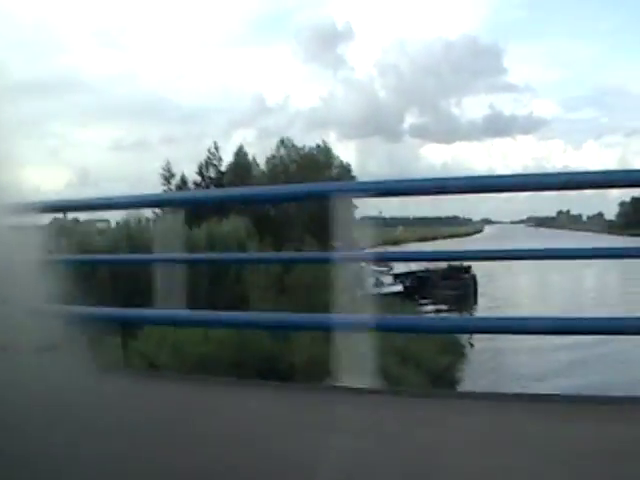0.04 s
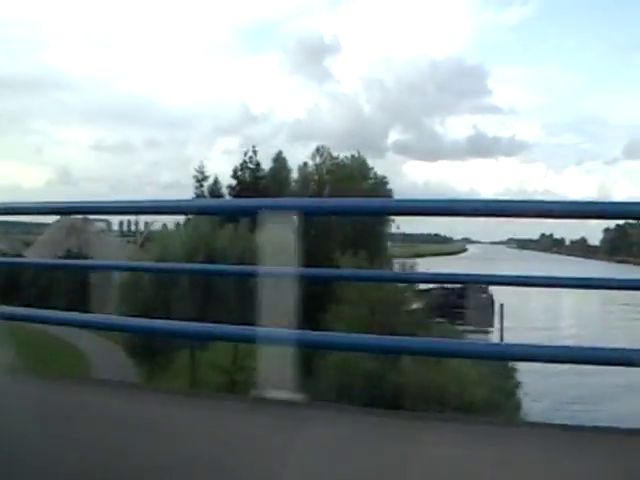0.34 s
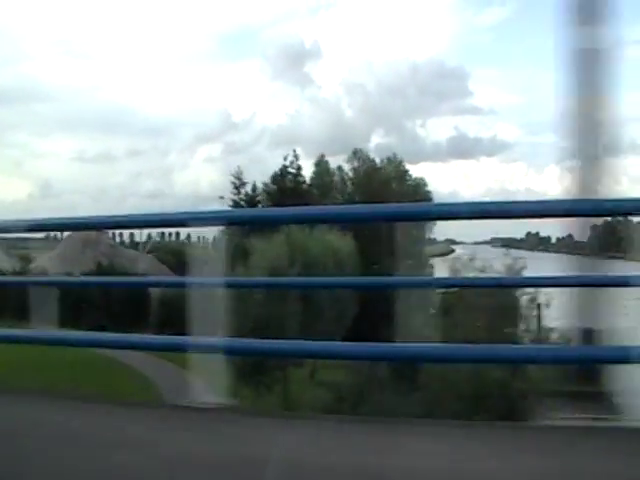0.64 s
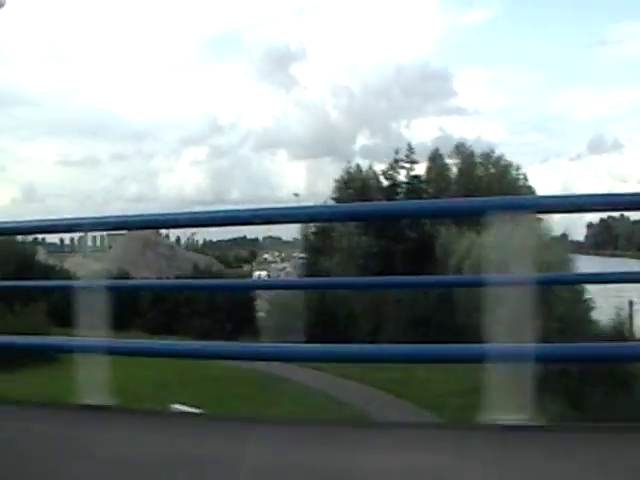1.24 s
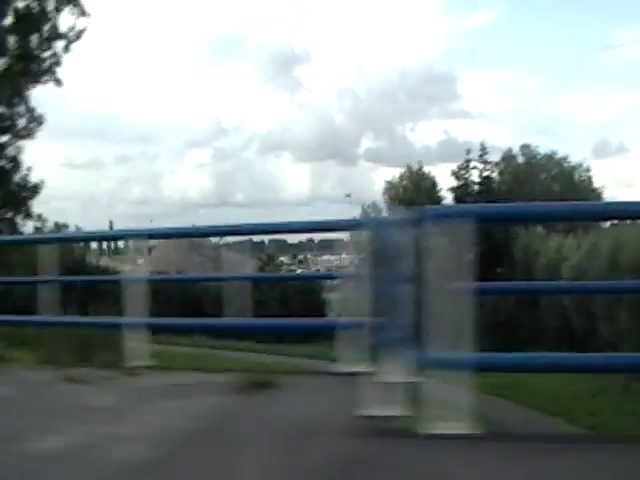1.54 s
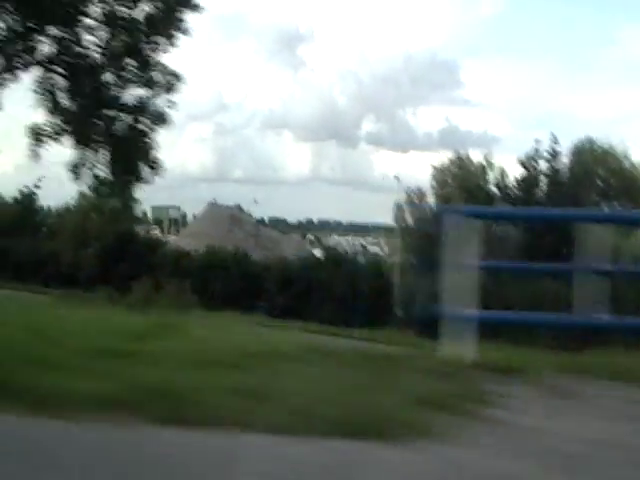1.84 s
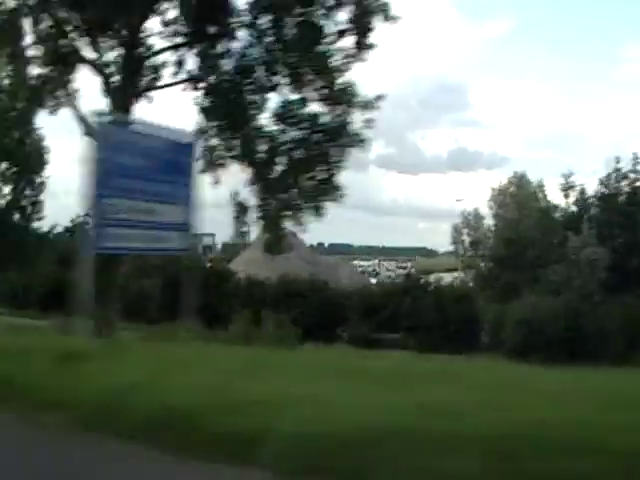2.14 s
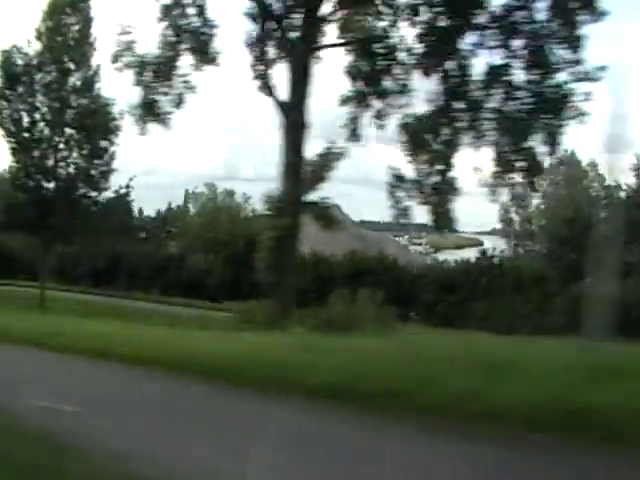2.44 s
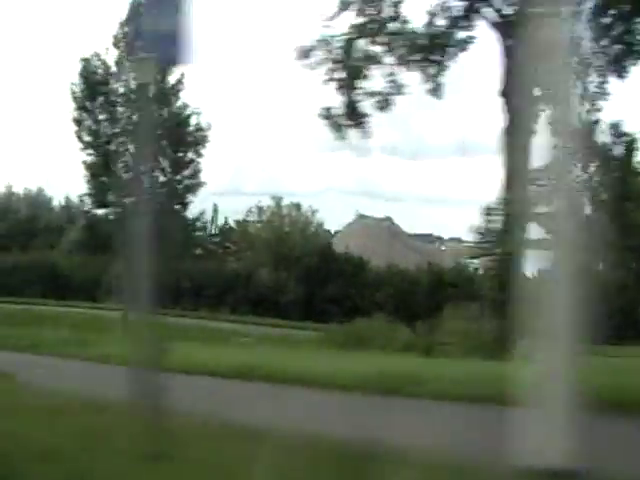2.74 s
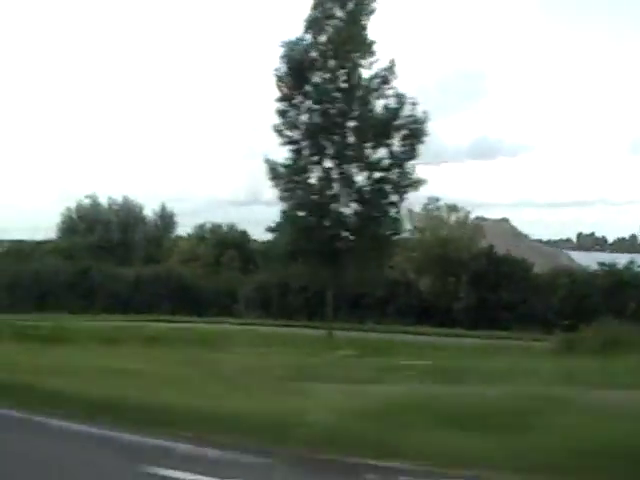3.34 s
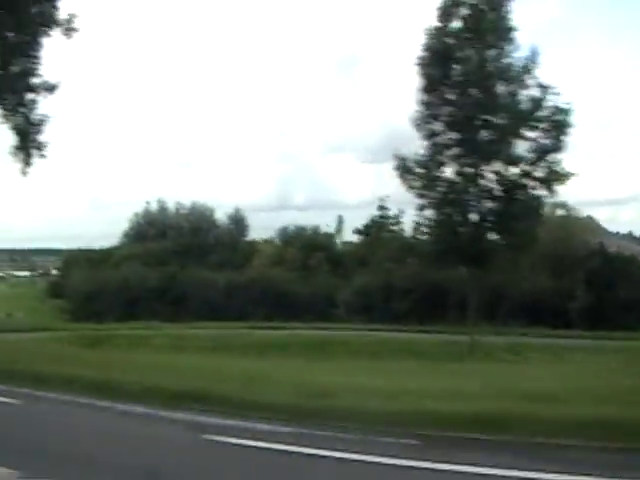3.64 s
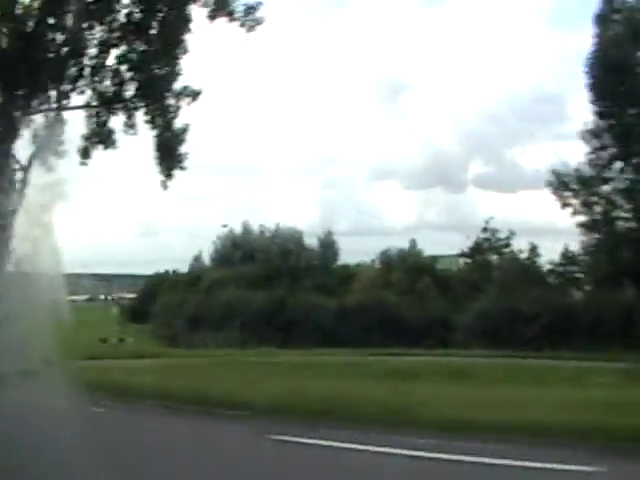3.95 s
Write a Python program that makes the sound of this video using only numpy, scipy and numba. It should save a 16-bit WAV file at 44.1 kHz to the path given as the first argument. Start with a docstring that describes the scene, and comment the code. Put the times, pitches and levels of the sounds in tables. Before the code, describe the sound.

A car driving, heard from inside, rumbling steadily with small creaks, thuds and one knock.

```python
"""Inside a car, leaving a bridge deck for smoother asphalt. The road shakes body and panels into a low
rumble; the tyres drone and roar, brighter off the bridge; air hisses along the windows. Loose trim
rattles, creaks and squeaks, and the wheels thud over seams at the bridge end. The indicator relay starts
to tick. One bump knocks hard enough to duck the gain control; a faint swish follows."""
import sys
import numpy as np
from scipy import signal
from scipy.fft import rfft, irfft
from scipy.io import wavfile
from scipy.ndimage import uniform_filter1d
from numba import njit

SR = 44100
rng = np.random.default_rng(int(sys.argv[2]) if len(sys.argv) > 2 else 0)


def master_out(mix):
    """Clip the mix to full scale and print it as 16-bit PCM to the path in sys.argv[1]."""
    frames = np.transpose(np.atleast_2d(mix))
    ceiling = np.clip(frames, -1, 1)
    pcm = np.round(ceiling * 32767).astype(np.int16)
    wavfile.write(sys.argv[1], SR, pcm)


N = 176400

# cabin stereo width, side against mid: f/Hz, level/dB
SIDE_SPECTRUM = [(60, -16.5), (250, -19), (500, -12.5), (1000, -8.5), (2000, -9), (5000, -4.5),
                 (12000, -9.5)]
# road shaking the body: t/s, boom level/dB, panel level/dB
ROAD_SHAKE = [(0, -16.5, -15.5), (.42, -16, -13.5), (.56, -10, -15), (0.799, -15, -14), (1.25, -14.5, -14),
              (1.45, -14.5, -17), (1.62, -13.5, -14.5), (1.78, -15, -21), (1.87, -20.5, -20.5),
              (3.25, -19.5, -20.5), (3.38, -15, -18), (3.48, -11, -16), (3.62, -13, -16.5),
              (3.85, -17, -16), (4, -14, -19.5)]
# resonances of cabin, panels and tread: f/Hz, width/Hz, level/dB
BOOM_MODES = [(61, 25, -9), (77.4, 14, -3.5), (93.2, 11.8, 0), (115.3, 36, -2)]
PANEL_MODES = [(163, 92, -1.5), (191, 52, -0.5), (234, 85, -2.5), (288.7, 56, -0.5), (323.5, 215, -11)]
TREAD_MODES = [(1445, 55, 0), (1710, 130, -6), (1865, 60, -6)]
# tyre roar on each surface, air on the windows: f/Hz, relative level/dB
DECK_SPECTRUM = [(220, -34.5), (380, -6), (465, -18.5), (508, -4.5), (753, -15.5), (1040, -16), (1470, -25),
                 (1740, -27), (2600, -43.5), (3380, -79), (5720, -120)]
ASPHALT_SPECTRUM = [(220, -30.5), (380, 1.5), (439, -7.5), (476, -1), (546, -1.5), (1040, -11),
                    (1280, -17.5), (1470, -12.5), (1880, -18.5), (2600, -32), (3380, -51.5), (5720, -120)]
AIR_SPECTRUM = [(2600, 5), (4000, -2), (6300, -17), (7800, -20), (9500, -26), (11500, -25.5),
                (16000, -36.5)]
# loose trim clicking, parts settling after the bump: t/s, level/dB
TRIM_CLICKS = [(0.7, -38), (1.001, -38), (1.231, -36.5), (1.26, -42), (1.346, -39), (1.396, -39.5),
               (1.606, -36), (1.772, -38.5), (1.818, -23.5), (1.916, -36.5)]
SETTLE_CLICKS = [(3.591, -30), (3.599, -35), (3.651, -29)]
# trim rubbing as the body twists: t/s, length/s, level/dB, f/Hz
TRIM_CREAKS = [(.858, .062, -39, 2700), (1.528, .045, -36, 1750), (1.664, .055, -34, 2000),
               (1.72, .013, -25, 1850), (1.728, .034, -33, 3000)]
# faint high squeaks: t/s, length/s, level/dB, f/Hz
HIGH_SQUEAKS = [(.94, .11, -70, 7000), (1.06, .23, -66, 7400), (1.78, .16, -71, 7100),
                (3.14, .13, -70, 6550)]
# wheels striking road seams: t/s, f/Hz, level/dB
SEAM_HITS = [(1.614, 195, -10), (1.661, 112, -4), (1.724, 89, -4.5), (1.773, 86, -3.5)]
# responses of the struck and rubbed parts: f/Hz, relative level/dB
RATTLE_SPECTRUM = [(700, -22.5), (1500, -8), (2200, 13.5), (3400, 0), (5000, 1.5), (6400, -7), (7700, -6.5),
                   (10000, -17.5), (12000, -12.5), (16500, -32.5)]
CREAK_SPECTRUM = [(900, 3), (1900, 4), (4200, -11.5), (12000, -29), (16500, -42)]
RELAY_SPECTRUM = [(3000, 1), (6300, -12), (8200, -0.5), (9700, -13), (11000, -8), (13500, -19),
                  (17000, -21)]
KNOCK_SPECTRUM = [(400, 1.5), (950, 3.5), (1700, -5.5), (2400, -4), (3450, -7), (6300, -22), (7600, -14.5),
                  (10500, -25), (12200, -24), (16500, -42)]

T_S = np.arange(N) / SR
F_HZ = np.maximum(np.arange(N // 2 + 1) * SR / N, 1)


def undb(db):
    """Decibels to gain."""
    return 10 ** (np.asarray(db) / 20)


def unit(x):
    """Scale to rms 1."""
    return x / np.sqrt(np.mean(x ** 2))


def colour(spectrum):
    """Gain per bin through (f/Hz, level/dB) points."""
    hz, db = np.array(spectrum, float).T
    return undb(np.interp(np.log(F_HZ), np.log(hz), db))


def resonances(modes):
    """Gain per bin of steep-sided resonances, summed in power."""
    power = 0
    for hz, width_hz, db in modes:
        detuning = (F_HZ ** 2 - hz ** 2) / (F_HZ * width_hz)
        power += (undb(db) / (1 + detuning ** 2)) ** 2
    return np.sqrt(power)


def ring(x, spectrum):
    """Minimum-phase filter of unit power, rolled off below the spectrum's first point."""
    gain = colour(spectrum) / (1 + (spectrum[0][0] / 2 / F_HZ) ** 2)
    cepstrum = irfft(np.log(unit(gain) + 1e-5), N)
    cepstrum[1:N // 2] *= 2
    cepstrum[N // 2 + 1:] = 0
    return irfft(rfft(x) * np.exp(rfft(cepstrum)), N)


def cabin_noise(gain):
    """Stereo noise of rms 1, narrow in the bass, wider in the treble."""
    mid, side = rfft(rng.standard_normal((2, N))) * gain
    side *= colour(SIDE_SPECTRUM)
    return unit(irfft(np.array([mid + side, mid - side]), N))


def white_noise(side_db):
    """White stereo noise of rms 1."""
    mid, side = rng.standard_normal((2, N))
    side *= undb(side_db)
    return unit(np.array([mid + side, mid - side]))


def wander(rate_hz):
    """Smooth random drift of rms 1."""
    return unit(irfft(rfft(rng.standard_normal(N)) * np.exp(-(F_HZ / rate_hz) ** 2), N))


def steady(x, span_s, amount):
    """Partly even out the slow swells of a noise; rms 1."""
    power = uniform_filter1d(np.mean(x ** 2, axis=0), int(span_s * SR))
    return unit(x / power ** (amount / 2))


def strike(start_s, rise_s, decay_s):
    """Contact envelope: linear rise, exponential decay."""
    age_s = np.maximum(T_S - start_s, 0)
    return np.minimum(age_s / rise_s, 1) * np.exp(-np.maximum(age_s - rise_s, 0) / decay_s)


def arch(start_s, length_s):
    """Half-sine envelope."""
    return np.sin(np.pi * np.clip((T_S - start_s) / length_s, 0, 1)).clip(0)


def thud(start_s, hz, rise_s):
    """Low, heavily damped swing of the body."""
    age_s = np.maximum(T_S - start_s, 0)
    return age_s / rise_s * np.exp(1 - age_s / rise_s) * np.sin(2 * np.pi * hz * age_s)


def asphalt_share(bridge_end_s=1.66, fade_s=.4):
    """Ramp from 0 on the deck to 1 on asphalt."""
    return np.clip((T_S - bridge_end_s) / fade_s + .5, 0, 1)


def body_rumble():
    """The road shakes the low cabin modes and the panels."""
    at_s, boom_db, panel_db = np.array(ROAD_SHAKE).T
    boom = steady(cabin_noise(resonances(BOOM_MODES)), span_s=.22, amount=.32)
    panels = steady(cabin_noise(resonances(PANEL_MODES)), span_s=.36, amount=.64)
    return boom * undb(np.interp(T_S, at_s, boom_db)) + panels * undb(np.interp(T_S, at_s, panel_db))


def tyre_drone(hz=268.26, width_hz=5.6, level_db=-26.5):
    """Air rings inside the tyres."""
    cavity = cabin_noise(resonances([(hz, width_hz, 0)]))
    return undb(level_db) * steady(cavity, span_s=.13, amount=.62)


def tyre_roar(roar_db=-25, tread_db=-41, flutter_db=1.14):
    """Roar flutters with the road and brightens on asphalt, where the tread sings."""
    deck = undb(roar_db) * cabin_noise(colour(DECK_SPECTRUM))
    asphalt = undb(roar_db) * cabin_noise(colour(ASPHALT_SPECTRUM))
    tread = undb(tread_db) * cabin_noise(resonances(TREAD_MODES))
    share = asphalt_share()
    roar = np.sqrt(1 - share) * deck + np.sqrt(share) * (asphalt + tread)
    return roar * undb(flutter_db * wander(rate_hz=35))


def air_rush(deck_db=-55, asphalt_boost_db=3):
    """Air hisses along the windows, a little stronger off the bridge."""
    low_cut = 1 / (1 + (AIR_SPECTRUM[0][0] / F_HZ) ** 4)
    hiss = cabin_noise(colour(AIR_SPECTRUM) * low_cut)
    return hiss * undb(deck_db + asphalt_boost_db * asphalt_share())


def rattles():
    """Loose plastic trim chatters in bursts of a few milliseconds."""
    clicks = sum(undb(db) * strike(at_s, rise_s=.001, decay_s=.007) for at_s, db in TRIM_CLICKS)
    settling = sum(undb(db) * strike(at_s, rise_s=.001, decay_s=.002) for at_s, db in SETTLE_CLICKS)
    return ring((clicks + settling) * white_noise(side_db=-6.5), RATTLE_SPECTRUM)


def creaks(slips_per_s=6000, scatter_db=2.5):
    """Trim rubs on trim in tiny, uneven slips; each spot rings at its own pitch."""
    slips = (rng.random(N) < slips_per_s / SR) * undb(scatter_db * rng.standard_normal(N))
    polarity = np.sign(white_noise(side_db=-6.5))
    scrape = unit(ring(slips * polarity, CREAK_SPECTRUM))
    out = 0
    for start_s, length_s, db, hz in TRIM_CREAKS:
        spot = unit(signal.lfilter(*signal.iirpeak(hz, Q=4, fs=SR), scrape))
        out += undb(db) * np.sqrt(arch(start_s, length_s)) * unit(scrape + spot / 2)
    return out


def squeaks(overtone_ratio=1.56, climb=.05, sag=.05, flicker_db=3.5):
    """Thin, wavering tone pairs climb as the rubbing swells and sink lower as it eases."""
    waver = .014 * wander(rate_hz=18) + .022 * wander(rate_hz=370)
    out = 0
    for start_s, length_s, db, hz in HIGH_SQUEAKS:
        swell = arch(start_s, length_s)
        progress = np.clip((T_S - start_s) / length_s, 0, 1)
        pitch_hz = hz * (1 + climb * swell - sag * progress ** 2 + waver)
        phase = 2 * np.pi * np.cumsum(pitch_hz) / SR
        out += undb(db) * np.sqrt(swell) * (np.sin(phase) + np.sin(overtone_ratio * phase))
    return out * unit(undb(flicker_db * wander(rate_hz=25)))


def seam_thuds():
    """The wheels thud over seams in the road."""
    return sum(undb(db) * thud(at_s, hz, rise_s=.0089) for at_s, hz, db in SEAM_HITS)


def indicator(start_s=2.3603, period_s=.7086, on_s=.3345, pull_db=-43, release_db=-39):
    """The relay behind the dashboard pulls in and lets go once a period."""
    force = 0
    for at_s in np.arange(start_s, N / SR, period_s):
        force += undb(pull_db) * strike(at_s, rise_s=.001, decay_s=.005)
        force += undb(release_db) * strike(at_s + on_s, rise_s=.0013, decay_s=.005)
    return ring(force * white_noise(side_db=-10), RELAY_SPECTRUM)


def bump(at_s=3.5447, rebound_delay_s=.0135, clack_hz=880, clack_decay_s=.002):
    """One hard contact with chatter, a short clack, a bright rebound and a low thump."""
    grain = white_noise(side_db=-2.5)
    contact = undb(3) * (np.arange(N) == round(at_s * SR))
    chatter = undb(-7) * strike(at_s, rise_s=.001, decay_s=.0013) * grain
    knock = ring(chatter - contact, KNOCK_SPECTRUM)
    age_s = np.maximum(T_S - at_s, 0)
    clack = undb(-13) * np.exp(-age_s / clack_decay_s) * np.sin(2 * np.pi * clack_hz * age_s)
    rebound = undb(-35) * strike(at_s + rebound_delay_s, rise_s=.003, decay_s=.0015) * grain
    thump = undb(3.5) * thud(at_s, hz=150, rise_s=.0055)
    return knock - clack + ring(rebound, RELAY_SPECTRUM) + thump


def swish(start_s=3.79, length_s=.18, level_db=-66, hz=9700, width_hz=3500):
    """A soft, high hiss swells and fades."""
    hiss = cabin_noise(resonances([(hz, width_hz, 0)]))
    return undb(level_db) * np.sqrt(arch(start_s, length_s)) * hiss


def scene():
    """Everything heard in the cabin."""
    driving = body_rumble() + tyre_drone() + tyre_roar() + air_rush()
    trim = rattles() + creaks() + squeaks()
    return driving + trim + seam_thuds() + indicator() + bump() + swish()


def record(dry):
    """Gain control ducks after loud peaks; soft clip at full scale; treble cut."""
    threshold_db, slope, top_hz = -4.5, .51, 15800
    peak = follow_peaks(np.abs(dry).max(axis=0), attack_s=.0014, release_s=.31)
    ducked = dry / np.maximum(peak / undb(threshold_db), 1) ** slope
    clipped = ducked / (1 + ducked ** 8) ** (1 / 8)
    return signal.sosfilt(signal.ellip(8, .2, 70, top_hz, fs=SR, output="sos"), clipped)


@njit
def follow_peaks(x, attack_s, release_s):
    """One-pole peak follower."""
    out, level = np.empty(len(x)), 0.
    for i in range(len(x)):
        lag_s = attack_s if x[i] > level else release_s
        level += (x[i] - level) / (lag_s * SR)
        out[i] = level
    return out


dry = scene()
out = record(dry)
master_out(out)
```